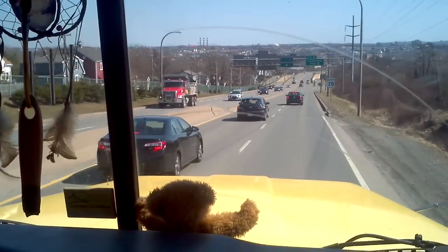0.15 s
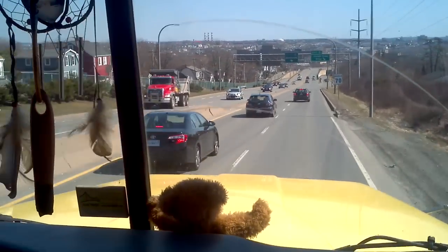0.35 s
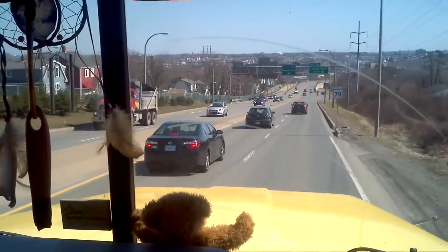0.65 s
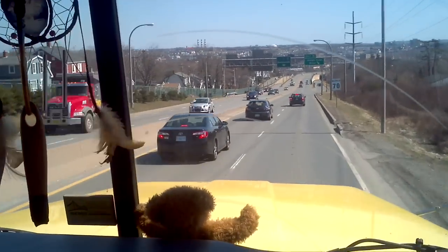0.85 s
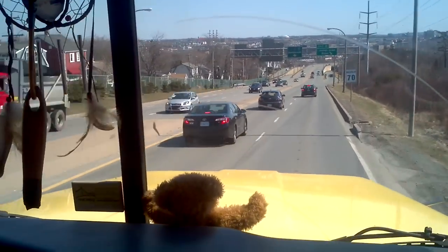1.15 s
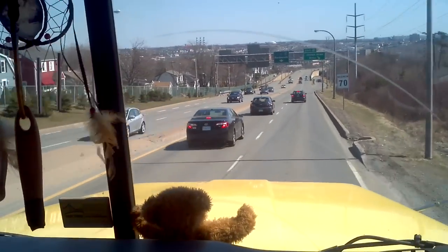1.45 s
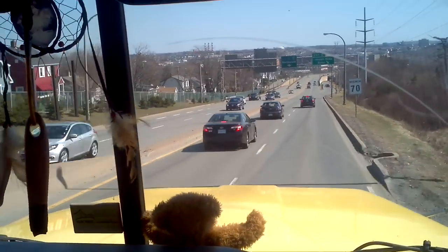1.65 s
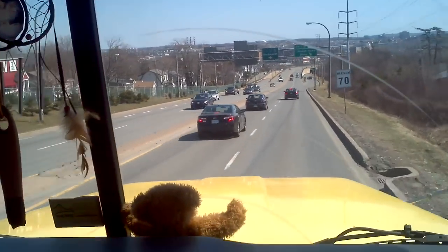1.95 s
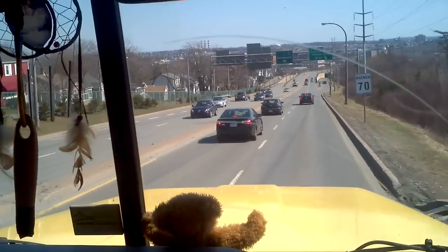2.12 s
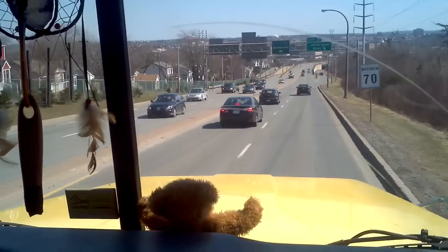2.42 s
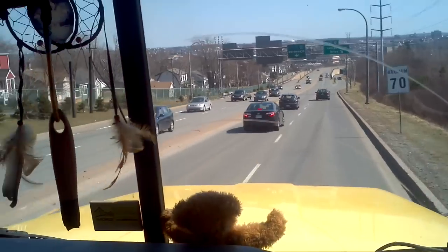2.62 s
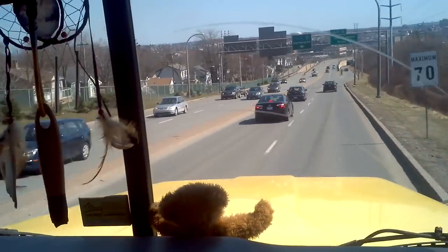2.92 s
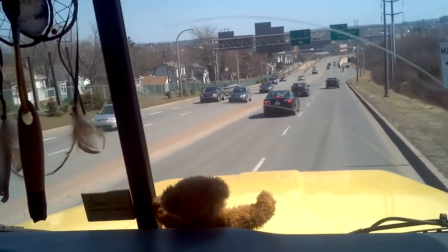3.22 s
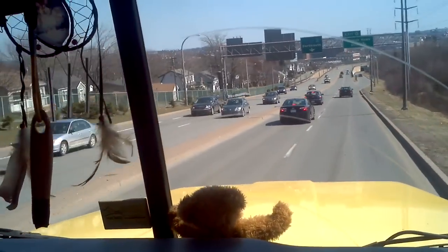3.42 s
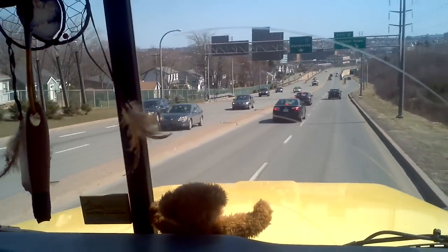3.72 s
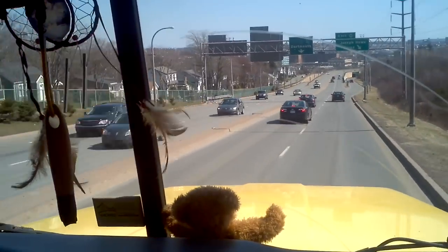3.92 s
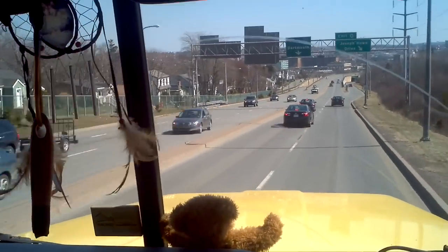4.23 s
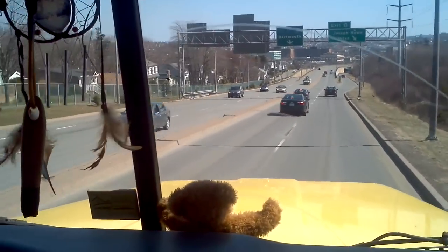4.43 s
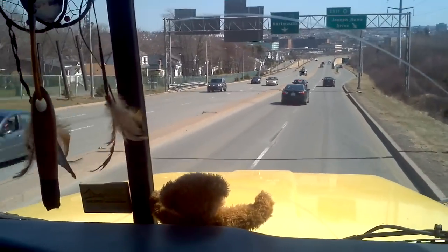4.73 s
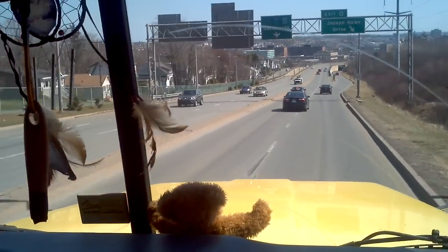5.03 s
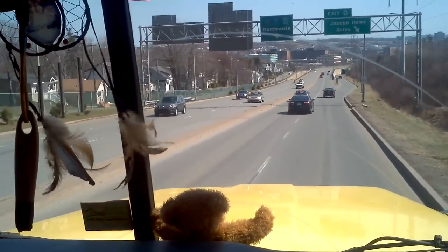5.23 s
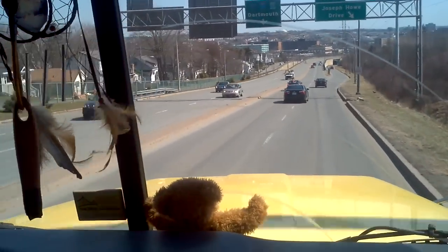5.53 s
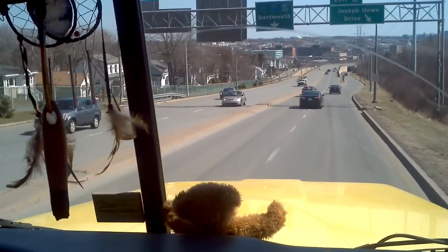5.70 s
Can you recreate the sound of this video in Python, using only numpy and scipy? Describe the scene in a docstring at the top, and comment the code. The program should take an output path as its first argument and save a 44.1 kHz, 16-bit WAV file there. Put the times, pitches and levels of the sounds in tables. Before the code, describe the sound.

Inside a heavy diesel truck, an engine brake barks briefly, cuts out for a throttle blip, then returns as a long, higher, raspy blare.

```python
"""An engine brake barks, drops out while the driver blips the throttle for a downshift, then barks at higher revs.
Heard inside the cab of a heavy six-cylinder diesel truck going downhill, at two close microphones.
Uneven puffs ring the exhaust and cab resonances; crank-timed noise makes the rasp, valve chatter and clatter.
Sine orders make the hum and drone, unsteady tones the turbo whistle and gear whine, shaped noise the road."""
import sys
import numpy as np
from scipy import signal
from scipy.fft import rfft, irfft, next_fast_len
from scipy.io import wavfile
from scipy.ndimage import uniform_filter1d

SR = 44100
rng = np.random.default_rng(int(sys.argv[2]) if len(sys.argv) > 2 else 0)


def store_wav(level_fs):
    """Save 16-bit WAV to argv[1]."""
    pcm = np.round(np.clip(np.atleast_2d(level_fs), -1, 1) * 32767)
    wavfile.write(sys.argv[1], SR, pcm.T.astype(np.int16))


N = 258426
TIME_S = np.arange(N) / SR
TURN = 2 * np.pi
REF_RPM = 2000


def undb(db):
    """Decibels to gain."""
    return 10 ** (np.asarray(db) / 20)


def decibels(gain):
    """Gain to decibels, floored at -80 dB."""
    return 20 * np.log10(np.maximum(gain, 1e-4))


def shape(x, response):
    """Filter by a response given as a function of frequency."""
    size = next_fast_len(N + SR // 2)
    f = np.maximum(np.arange(size // 2 + 1) * SR / size, 1)
    return irfft(rfft(x, size) * response(f), size)[..., :N]


def resonance(f, hz, width_hz):
    """Band-pass response, gain 1 at the centre."""
    return 1 / (1 + 1j * (f * f - hz * hz) / (f * width_hz))


def white():
    """Unrelated noise at the two microphones, 0 dB per Hz."""
    return rng.standard_normal((2, N)) * np.sqrt(SR / 2)


def colour(x, points):
    """Filter by (Hz, dB) points, interpolated over log frequency."""
    hz, db = np.transpose(points)
    return shape(x, lambda f: undb(np.interp(np.log(f), np.log(hz), db)))


def bass_cut(x, hz):
    """Fourth-order high-pass: little deep bass gets through."""
    return signal.sosfilt(signal.butter(4, hz, "high", fs=SR, output="sos"), x)


def walk(rate_hz):
    """Slow random wander with a spread near 1."""
    k = int(SR / rate_hz)
    steps = np.repeat(rng.standard_normal(1024)[:N // k + 1], k)
    smooth = uniform_filter1d(uniform_filter1d(steps, k), k)
    return 1.3 * smooth[:N]


def held(on_s, off_s, attack_s, release_s):
    """A control that rises to 1, is held and falls back to 0."""
    return np.interp(TIME_S, [on_s, on_s + attack_s, off_s, off_s + release_s], [0, 1, 1, 0])


def whistle(hz, db, flicker_db, left_db, unsteady):
    """A thin tone from a fast-spinning part, wandering in pitch and level."""
    phase = TURN * np.cumsum(hz * (1 + unsteady * walk(160))) / SR
    level_db = db + flicker_db * walk(60)
    return np.sqrt(2) * np.sin(phase) * undb(level_db) * undb([[left_db], [0]])


# crank speed: (time [s], speed [rpm])
CRANK_SPEED = [(0.0, 1712), (0.22, 1712), (0.33, 1707), (0.8, 1547), (0.9, 1602), (1.1, 1902), (1.2, 1962),
               (1.4, 2062), (1.6, 2027), (1.8, 1952), (1.9, 2072), (2.1, 2030), (2.3, 2034), (2.8, 2027),
               (3.45, 2036), (4.0, 2055), (4.8, 2078), (5.86, 2112)]
CRANK_START_CYCLES = .848


def crank():
    """Crank speed, and its integral as four-stroke cycles of two turns."""
    time_s, speed_rpm = np.transpose(CRANK_SPEED)
    rpm = np.interp(TIME_S, time_s, speed_rpm)
    return rpm, CRANK_START_CYCLES + np.cumsum(rpm / 120) / SR


# spells on the engine brake, levels before bite and build:
# (on [s], off [s], puffs [dB], rasp [dB], change of clatter [dB], roar [dB])
BRAKE_SPELLS = [(-.4, .195, -3.5, -5.5, 2, -4.5), (1.822, 6, -0.34, -4.5, -8.5, -32)]
BRAKE_ATTACK_S, PUFF_RELEASE_S, RASP_RELEASE_S = 0.021, 0.064, 0.087
# the brake bites hard at first, settles, then builds slowly while held
BITE_DELAY_S, BITE_S, PUFF_BITE_DB, RASP_BITE_DB = 0.062, 0.12, 0.5, 8
PUFF_BUILD_DB_PER_S, RASP_BUILD_DB_PER_S = 0.5, 1.35
# the rasp creeps in before the brake, likely as the clutch takes up
CLUTCH_ON_S, CLUTCH_ATTACK_S, CLUTCH_RASP_DB = 1.44, 0.24, -6
# valve chatter relative to the rasp
CHATTER_DB, CHATTER_BITE_DB = -0.17, -1


def bite(on_s):
    """The hard first moment of a braking: builds over the first strokes to 1, then eases."""
    return np.exp(-((TIME_S - on_s - BITE_DELAY_S) / BITE_S) ** 2)


def brake_levels():
    """Brake engagement (0-1), and the dB of puffs, rasp, valve chatter and change of clatter."""
    brake, puffs, chatter_db, clatter_db = 0, 0, CHATTER_DB, 0
    clutch = held(CLUTCH_ON_S, BRAKE_SPELLS[-1][0], CLUTCH_ATTACK_S, BRAKE_ATTACK_S)
    rasp = undb(CLUTCH_RASP_DB) * clutch
    for on_s, off_s, puff_db, rasp_db, change_db, _ in BRAKE_SPELLS:
        age_s = TIME_S - on_s
        engaged = held(on_s, off_s, BRAKE_ATTACK_S, PUFF_RELEASE_S)
        rasping = held(on_s, off_s, BRAKE_ATTACK_S, RASP_RELEASE_S)
        puffs = puffs + engaged * undb(puff_db + PUFF_BITE_DB * bite(on_s) + PUFF_BUILD_DB_PER_S * age_s)
        rasp = rasp + rasping * undb(rasp_db + RASP_BITE_DB * bite(on_s) + RASP_BUILD_DB_PER_S * age_s)
        chatter_db = chatter_db + CHATTER_BITE_DB * bite(on_s)
        brake = brake + engaged
        clatter_db = clatter_db + change_db * engaged
    rasp_db = decibels(rasp)
    return brake, decibels(puffs), rasp_db, rasp_db + chatter_db, clatter_db


# cylinders in firing order; the second puff comes half a firing later, negative delays are early:
# (first puff [relative dB], second puff [relative dB], first delay [puff spacings], second delay [puff spacings])
CYLINDER_PUFFS = [(17, 6.5, -0.1475, -0.18), (13.6, 10.5, -0.087, -0.32), (10.3, 7.5, 0.4, -0.028),
                  (19.67, 1.5, -0.1793, -0.31), (3.73, -2, 0.18, -0.09), (13, -0.3, -0.1, -0.32)]
# exhaust and cab resonances: (centre [Hz], width [Hz], left [signed gain], right [signed gain])
CAB_RESONANCES = [(125.7, 14, -0.29, 0.022), (134.6, 46, 0.19, 0.023), (190.1, 28.9, -0.23, -0.33),
                  (194.2, 15, 0.35, -0.228), (216.3, 18.3, 0.14, 0.0024), (228.5, 28, -0.14, 0.21),
                  (284, 67, -0.085, -0.11), (302.8, 54, 0.1, 0.095), (362, 11, 0.0062, -0.072),
                  (384.4, 25.1, -0.18, -0.27), (398, 21.8, 0.2, 0.26), (416.7, 11.3, 0.035, 0.075),
                  (426, 11, -0.038, 0.081), (465, 29, -0.083, 0.025), (488, 34, 0.041, 0.015),
                  (505.1, 21.3, -0.16, 0.088), (506.1, 14, 0.21, -0.11), (557.6, 31.3, 0.0077, -0.12),
                  (563.7, 17.7, 0.015, 0.1), (586, 64, 0.017, 0.052), (624, 17.6, -0.045, -0.036),
                  (751, 21, -0.0022, -0.031), (771, 21.4, 0.031, 0.058), (806, 21, 0.012, 0.027),
                  (898, 117.5, -0.0267, -0.025), (912, 58, 0.035, 0.034), (1018.5, 23.0, 0.0006, 0.0155),
                  (1005.6, 8.7, 0.0175, 0.0094)]
# gas crack spectrum: (frequency [Hz], relative density [dB/Hz])
CRACK_SPECTRUM = [(100, -100), (400, -90), (700, -83), (1100, -79), (1600, -97), (2400, -85), (4000, -93.5),
                  (15000, -115)]
PUFF_SCATTER_DB, PUFF_JITTER_SPACINGS = .2, .003


def brake_bark(cycle, db, low_hz=100, ring_db=27.0, crack_s=0.0031):
    """Twelve uneven puffs a cycle, nearly alike each round, ring pipe and cab; each opens with a gas crack."""
    cylinders = np.array(CYLINDER_PUFFS)
    pattern, late = undb(cylinders[:, :2].ravel()), cylinders[:, 2:].ravel()
    chance = rng.standard_normal((1400, 2))
    slot = np.arange(len(chance))
    place = slot % len(pattern)
    puff_cycle = (slot + late[place] + PUFF_JITTER_SPACINGS * chance[:, 0]) / len(pattern)
    at = np.interp(puff_cycle, cycle, np.arange(N), left=-1, right=-1)
    heard = at >= 0
    size = (pattern[place] * undb(PUFF_SCATTER_DB * chance[:, 1]))[heard]
    # each puff is shared between two neighbouring samples
    whole, part = np.divmod(at[heard], 1)
    whole = whole.astype(int)
    puffs = np.bincount(whole, size * (1 - part), N + 1)[:N]
    puffs = puffs + np.bincount(whole + 1, size * part, N + 1)[:N]

    def ring(f):
        return sum(np.outer(gains, resonance(f, hz, width)) for hz, width, *gains in CAB_RESONANCES)

    rung = -shape(puffs * undb(db + ring_db), ring)
    burst = signal.lfilter([1], [1, -np.exp(-1 / (crack_s * SR))], puffs)
    crack = colour(white() * burst * undb(db), CRACK_SPECTRUM)
    return bass_cut(rung, low_hz) + crack


# valve rattle spectrum: (frequency [Hz], relative density [dB/Hz])
CHATTER_SPECTRUM = [(50, -95), (350, -88), (520, -71), (680, -75), (900, -64), (1150, -71.5), (1550, -77),
                    (2400, -74), (3300, -72.5), (5000, -85), (15000, -103)]


def valve_chatter(cycle, db, throb_db=5.0, throb_at=0.28, strike_db=-1.0, strike_at=0.06,
                  limp_db=1.0, limp_at=0.2):
    """The valve gear repeats one rattle every cycle, so it sounds as a dense comb of clean lines."""
    place = np.linspace(0, 1, 2600)
    rattle = np.array([np.interp(cycle % 1, place, row[:len(place)]) for row in white()])
    throb = throb_db * np.cos(2 * TURN * (cycle - throb_at))
    limp = limp_db * np.cos(TURN * (cycle - limp_at))
    strikes = strike_db * np.cos(2 * len(CYLINDER_PUFFS) * TURN * (cycle - strike_at))
    return colour(rattle * undb(db + throb + limp + strikes), CHATTER_SPECTRUM)


# escaping air spectrum: (frequency [Hz], relative density [dB/Hz])
RASP_SPECTRUM = [(50, -79), (200, -64), (420, -71), (700, -72), (1000, -76.5), (1550, -81), (2800, -74),
                 (4200, -73.5), (5400, -85.5), (7500, -115), (9000, -91), (15000, -94)]
# rings of the engine top: (centre [Hz], width [Hz], relative peak density [dB/Hz])
ENGINE_TOP_RINGS = [(1900, 23, -67.5), (2302, 170, -64.5), (3487, 34, -64)]


def brake_rasp(cycle, db, throb_db=1.5, throb_at=0.11, limp_db=1.4, limp_at=0.34, flutter_db=-2.0,
               hiss_hz=6600, hiss_width_hz=1100, hiss_left_db=-77, hiss_right_db=-63):
    """Escaping air rasps in time with the crank, rings the engine top and hisses."""
    throb = throb_db * np.cos(2 * TURN * (cycle - throb_at))
    limp = limp_db * np.cos(TURN * (cycle - limp_at))
    flutter = flutter_db * np.cos(2 * len(CYLINDER_PUFFS) * TURN * cycle)
    gate = undb(db + throb + limp + flutter)

    def ring(f):
        return sum(undb(peak) * resonance(f, hz, width) for hz, width, peak in ENGINE_TOP_RINGS)

    rings = shape(white() * gate, ring)
    hiss = shape(white() * gate, lambda f: resonance(f, hiss_hz, hiss_width_hz) ** 2)
    return colour(white() * gate, RASP_SPECTRUM) + rings + hiss * undb([[hiss_left_db], [hiss_right_db]])


# broad pipe resonances: (centre [Hz], width [Hz], left [relative dB/Hz], right [relative dB/Hz])
PIPE_RESONANCES = [(198.6, 74, -54, -40.5), (381.6, 65, -49, -47.5), (571, 44, -55, -55.5),
                   (766, 57, -57, -50.5), (923, 91, -62, -63)]
ROAR_BITE_DB = 0


def pipe_roar(cycle, throb_db=4, throb_at=0.2):
    """While the brake is unsettled, at low revs or as it bites, ragged gas roars in the pipe resonances."""
    ragged = 0
    for on_s, off_s, *_, roar_db in BRAKE_SPELLS:
        engaged = held(on_s, off_s, BRAKE_ATTACK_S, PUFF_RELEASE_S)
        ragged = ragged + engaged * (undb(roar_db) + undb(ROAR_BITE_DB) * bite(on_s))
    gas = white()[0] * ragged * undb(throb_db * np.cos(2 * TURN * (cycle - throb_at)))

    def pipe(f):
        return sum(np.outer(undb(sides), resonance(f, hz, width) ** 2)
                   for hz, width, *sides in PIPE_RESONANCES)

    return shape(gas, pipe)


# blade tone lags a goal set by revs, throttle and brake
TURBO_START_HZ, TURBO_COAST_HZ, TURBO_THROTTLE_HZ, TURBO_BRAKE_HZ = 5984, 3336, 4755, 3704
TURBO_REVS_POWER, TURBO_LAG_S = 1.46, 1.03
# off the brake: grows with revs, fades with pitch; on it: grows with pitch
COAST_WHISTLE_DB, COAST_WHISTLE_DB_PER_DOUBLING, COAST_WHISTLE_DB_PER_KHZ = -54.5, 12, -1
BRAKE_WHISTLE_DB, BRAKE_WHISTLE_DB_PER_KHZ = -47, 6
COAST_WHISTLE_HZ, BRAKE_WHISTLE_HZ = 4800, 7000


def turbo(rpm, throttle, brake):
    """The turbo runs down while the engine coasts and spools up on throttle or brake."""
    coast_goal_hz = TURBO_COAST_HZ * (rpm / REF_RPM) ** TURBO_REVS_POWER
    goal_hz = coast_goal_hz + TURBO_THROTTLE_HZ * throttle + TURBO_BRAKE_HZ * brake
    keep = np.exp(-1 / (TURBO_LAG_S * SR))
    hz = TURBO_START_HZ + signal.lfilter([1 - keep], [1, -keep], goal_hz - TURBO_START_HZ)
    coast_db = COAST_WHISTLE_DB + COAST_WHISTLE_DB_PER_DOUBLING * np.log2(rpm / REF_RPM)
    coast_db = coast_db + COAST_WHISTLE_DB_PER_KHZ * (hz - COAST_WHISTLE_HZ) / 1000
    brake_db = BRAKE_WHISTLE_DB + BRAKE_WHISTLE_DB_PER_KHZ * (hz - BRAKE_WHISTLE_HZ) / 1000
    db = coast_db + brake * (brake_db - coast_db)
    return whistle(hz, db, flicker_db=3.8, left_db=-7.5, unsteady=.004)


# likely a gear on the crank, loud where its mesh tone meets a housing resonance
GEAR_TEETH, WHINE_DB, HOUSING_HZ, HOUSING_WIDTH_HZ = 55, -43.5, 1862, 29


def gear_whine(cycle, rpm, brake, throb_db=3.5, throb_at=0.21):
    """Loaded by the brake, the gear sings at its mesh rate and throbs once a cycle."""
    hz = GEAR_TEETH * rpm / 60
    housing = np.abs(resonance(hz, HOUSING_HZ, HOUSING_WIDTH_HZ))
    db = WHINE_DB + decibels(brake * housing) + throb_db * np.cos(TURN * (cycle - throb_at))
    return whistle(hz, db, flicker_db=2.0, left_db=-44, unsteady=.002)


# tyre rumble spectrum: (frequency [Hz], density [dB/Hz])
ROAD_SPECTRUM = [(25, -98), (55, -101), (90, -72), (130, -66.5), (250, -63.5), (420, -64.5), (700, -68.5),
                 (1000, -69), (1700, -80.5), (2400, -77.5), (4700, -84.5), (6500, -76.5), (8500, -99),
                 (15000, -99)]


def road_noise():
    """Tyres rumble as shaped noise with a slight level wander."""
    return colour(white(), ROAD_SPECTRUM) * undb(0.42 * walk(5.1))


# engine orders: (multiple of the cycle rate, relative level [dB])
HUM_ORDERS = [(6, -45), (7, -52), (9, -41), (10, -44), (12, -42.5), (14, -37.5), (15, -42), (18, -55),
              (21, -46), (22, -43.5), (24, -41), (33, -43.5)]
DRONE_ORDERS = [(6, -45), (12, -36), (24, -42)]
# cab booms the orders pass through: (centre [Hz], width [Hz], boost [dB])
CAB_BOOMS = [(99, 10, 6.5), (115, 17, 19.5), (389, 14, 5)]
# combustion clatter spectrum: (frequency [Hz], relative density [dB/Hz])
CLATTER_SPECTRUM = [(50, -83), (110, -87), (250, -54), (420, -59.5), (600, -61.5), (950, -63), (1170, -70),
                    (1380, -65.5), (1700, -77.5), (2400, -73.5), (5000, -92.5), (7500, -83.5), (10000, -92),
                    (15000, -99)]
# level laws: (coasting at REF_RPM [dB], slope [dB per doubling of revs], added by throttle [dB])
HUM_LEVEL = (-3, 40, -1.2)
DRONE_LEVEL = (-10, 3.3, 12.2)
CLATTER_LEVEL = (-2.5, 27, 2.4)
BRAKE_MUTES_DB = -26


def engine_lines(cycle, rpm, orders, waver_db, right_db):
    """Wavering orders swell through cab booms; reflections give each microphone its own phase."""
    lines = 0
    for k, db in orders:
        hz = k * rpm / 120
        boom_db = sum(boost * np.abs(resonance(hz, centre, width)) ** 2 for centre, width, boost in CAB_BOOMS)
        offset = rng.random() + np.array([[0], [rng.normal(0, 0.277)]])
        level = undb(db + boom_db + waver_db * walk(22))
        lines = lines + level * np.sin(TURN * (k * cycle + offset))
    return np.sqrt(2) * lines * undb([[-right_db], [right_db]])


def free_engine(cycle, rpm, throttle, brake, change_db, knock_db=2.0, low_hz=104):
    """Off the brake the engine hums and clatters once a firing; the throttle makes the exhaust drone."""
    def level_db(law):
        db, revs_db, throttle_db = law
        return db + revs_db * np.log2(rpm / REF_RPM) + throttle_db * throttle

    hum = engine_lines(cycle, rpm, HUM_ORDERS, waver_db=2.5, right_db=0.5) * undb(level_db(HUM_LEVEL))
    drone = engine_lines(cycle, rpm, DRONE_ORDERS, waver_db=2.5, right_db=1.5) * undb(level_db(DRONE_LEVEL))
    knock = knock_db * np.cos(len(CYLINDER_PUFFS) * TURN * cycle)
    clatter = colour(white() * undb(level_db(CLATTER_LEVEL) + change_db + knock), CLATTER_SPECTRUM)
    return bass_cut((hum + drone) * undb(BRAKE_MUTES_DB * brake), low_hz) + clatter


# knocks of the gear change and the road: (time [s], relative level [dB], centre [Hz], decay [s])
CAB_KNOCKS = [(0.635, -27.5, 191, 0.026), (.885, -34, 210, 0.049), (1.5, -39, 130, 0.042),
              (4.405, -21, 233, 0.021)]


def knocks(width_hz=70):
    """Dull thuds shake the cab briefly: decaying noise in a narrow band."""
    out = 0
    for start_s, db, hz, decay_s in CAB_KNOCKS:
        age_s = TIME_S - start_s
        decay = (age_s > 0) * np.exp(-np.abs(age_s) / decay_s)
        shake = white() / np.sqrt(width_hz) * decay
        out = out + undb(db) * shape(shake, lambda f: resonance(f, hz, width_hz) ** 2)
    return out


# throttle blip of the downshift
BLIP_ON_S, BLIP_OFF_S, BLIP_ATTACK_S, BLIP_RELEASE_S = .84, 1.18, .08, 0.076


def scene():
    """One crank drives all engine sounds, worked by brake and throttle, over the road noise."""
    rpm, cycle = crank()
    throttle = held(BLIP_ON_S, BLIP_OFF_S, BLIP_ATTACK_S, BLIP_RELEASE_S)
    brake, puff_db, rasp_db, chatter_db, clatter_db = brake_levels()
    bark = brake_bark(cycle, puff_db) + valve_chatter(cycle, chatter_db)
    gas = brake_rasp(cycle, rasp_db) + pipe_roar(cycle)
    tones = turbo(rpm, throttle, brake) + gear_whine(cycle, rpm, brake)
    engine = free_engine(cycle, rpm, throttle, brake, clatter_db)
    return bark + gas + tones + road_noise() + engine + knocks()


MIC_LAG_SAMPLES, TOP_HZ = 15, 15800


def record(dry, widen_from_hz=1130, widen_full_hz=1450):
    """Widen the treble by subtracting the other microphone's delayed signal, then cut the top."""
    def share(f):
        return np.interp(f, [widen_from_hz, widen_full_hz], [0, 1])

    crossed = shape(dry[::-1], lambda f: share(f) * np.exp(-1j * TURN * f * MIC_LAG_SAMPLES / SR))
    wide = shape(dry - crossed, lambda f: 1 / np.sqrt(1 + share(f) ** 2))
    return signal.sosfilt(signal.ellip(10, .2, 80, TOP_HZ, fs=SR, output="sos"), wide)


dry = scene()
out = record(dry)
store_wav(out)
```